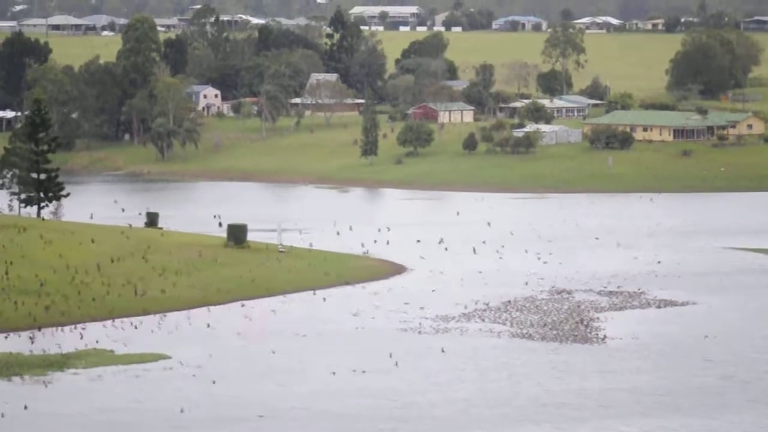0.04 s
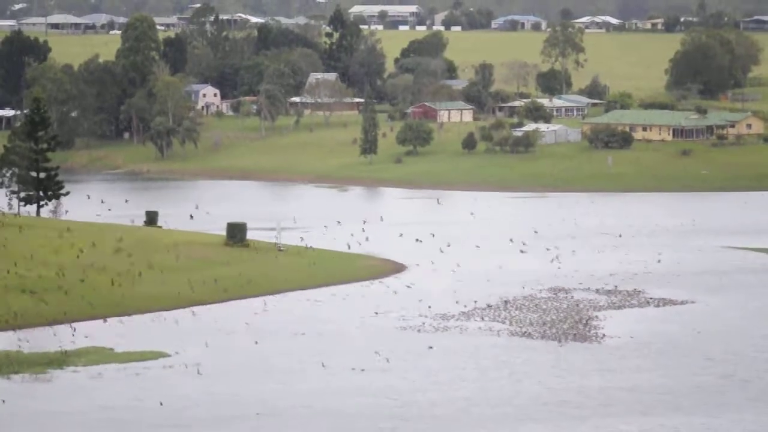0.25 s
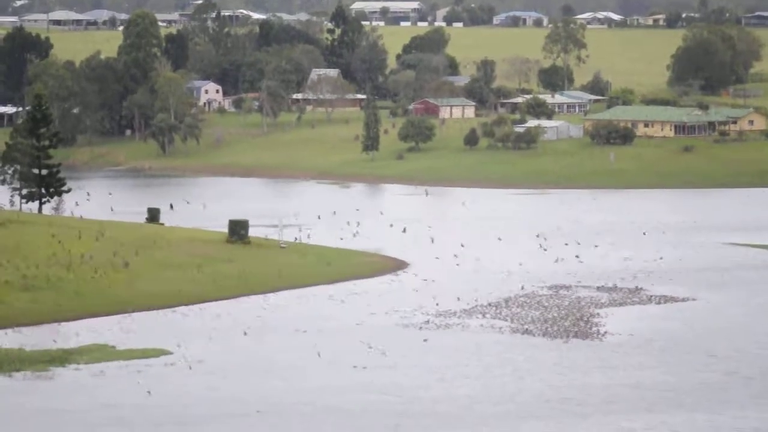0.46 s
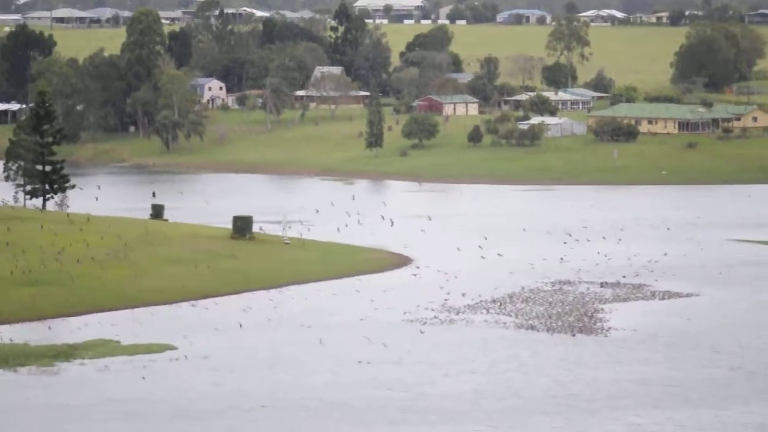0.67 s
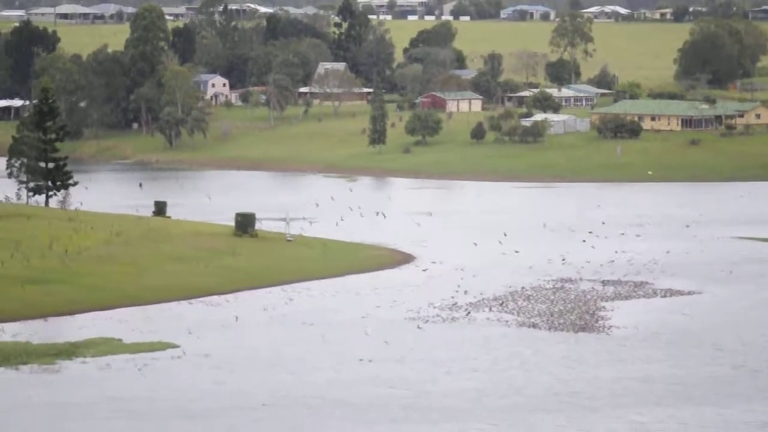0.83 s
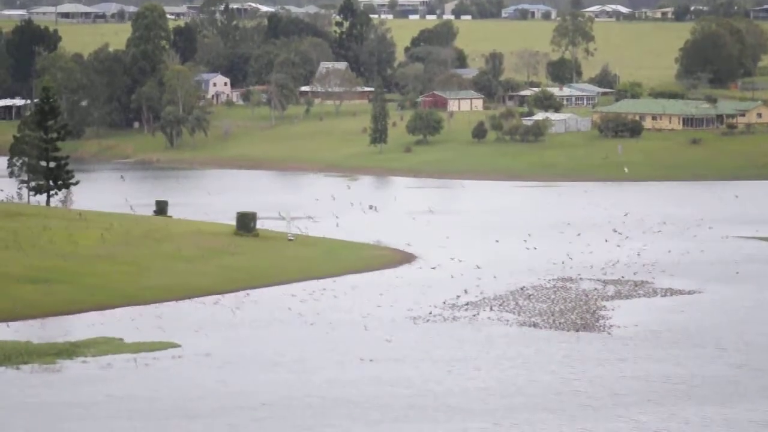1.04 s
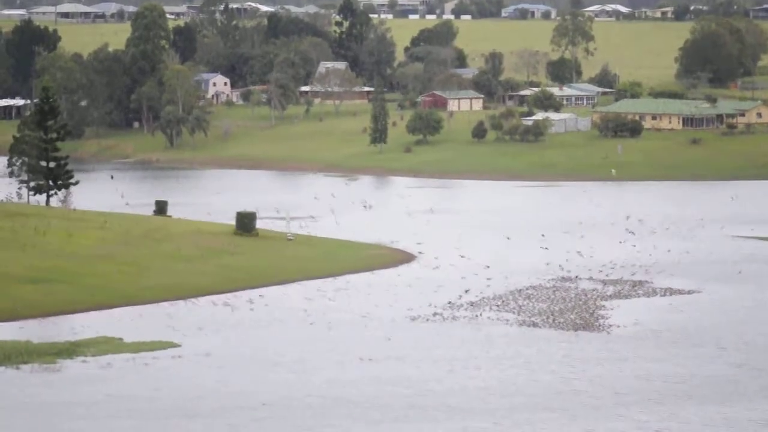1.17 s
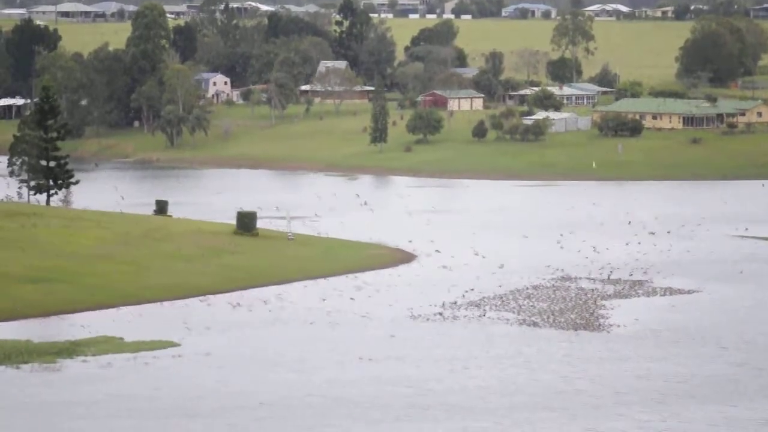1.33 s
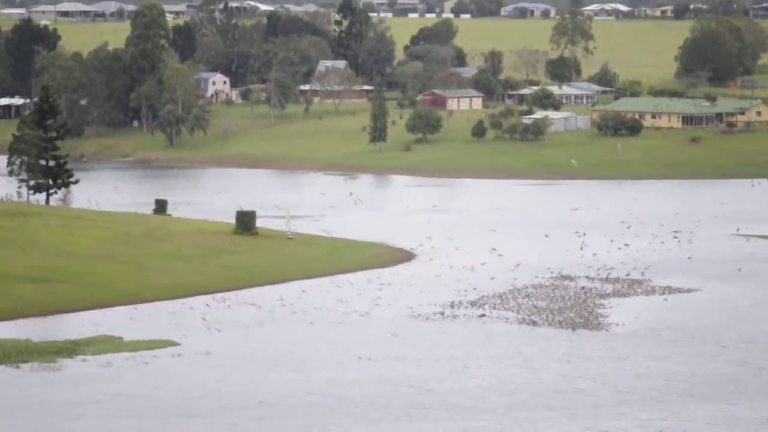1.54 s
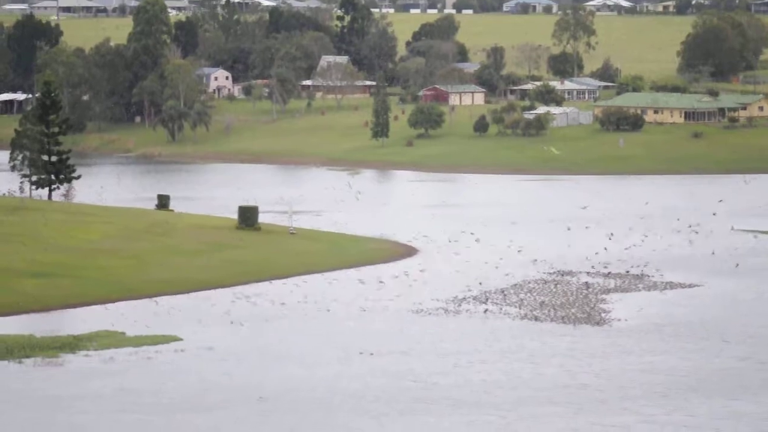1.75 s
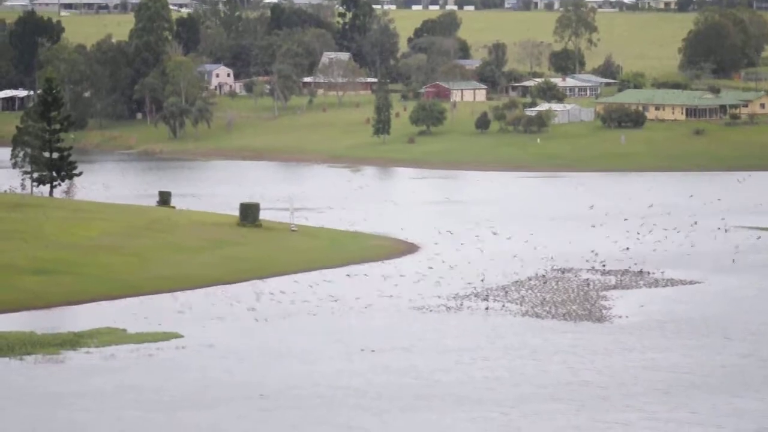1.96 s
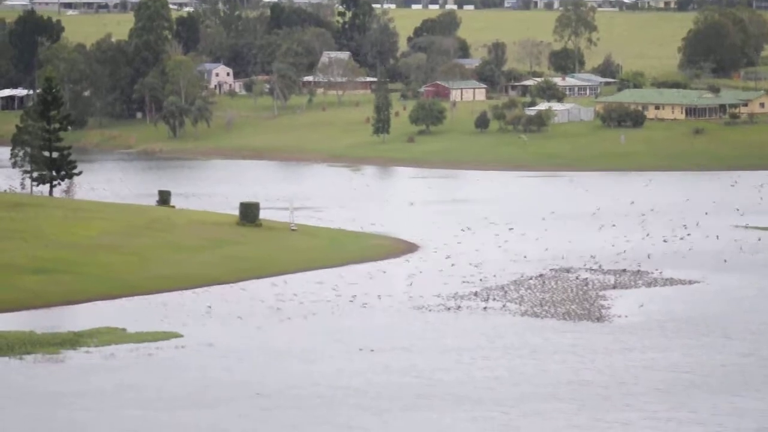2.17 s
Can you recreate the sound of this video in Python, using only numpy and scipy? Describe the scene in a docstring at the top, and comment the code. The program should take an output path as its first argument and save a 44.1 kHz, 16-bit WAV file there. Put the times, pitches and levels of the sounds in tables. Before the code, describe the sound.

Distant ducks keep up a dense, high whistling chatter across open water in a faint breeze. Close to the microphone, handling makes two quick, loud knocks near the start and a few light ticks about halfway through.

```python
"""Whistling ducks on a lake

A big flock calls far out on the water: nearer whistles, each a tone gliding along an arch of pitch,
stand out of a dense chorus, over faint wind and hum. Close by, a hand-held camera is knocked twice
and later ticks lightly; each contact rings its damped modes. The sound is mono and sampled slowly,
so the top of the whistles folds back in frequency (aliasing)."""
import sys
import numpy as np
from scipy import signal
from scipy.io import wavfile

SR = 44100
rng = np.random.default_rng(int(sys.argv[2]) if len(sys.argv) > 2 else 0)


def transcribe(signal):
    """Save signal, clipped to [-1, 1], as a 16-bit WAV file at the path in sys.argv[1]."""
    frames = np.atleast_2d(signal).T
    limited = np.clip(frames, -1, 1)
    pcm = np.round(limited * 32767).astype(np.int16)
    wavfile.write(sys.argv[1], SR, pcm)


N = 97020
TIME = np.arange(N) / SR


def flock():
    """Superposition: near whistles add to a chorus, lower chatter and a wash of the farthest birds."""
    # nearer calls: t/s, duration/s, first f/Hz, middle f/Hz, last f/Hz, level/dB
    near_calls = [(-.02, .09, 4850, 5090, 4750, -41), (.06, 0.058, 4500, 4220, 3540, -46),
                  (.08, 0.042, 3160, 3020, 2800, -50), (.13, 0.11, 4050, 4570, 5040, -52.5),
                  (.215, 0.031, 5400, 5200, 5100, -50), (.24, 0.053, 4500, 4020, 3560, -46.5),
                  (.35, .052, 4650, 4950, 5400, -41), (.412, .065, 4980, 4850, 4520, -41),
                  (.44, .075, 4550, 4220, 4100, -46), (.465, 0.046, 4550, 5260, 5680, -44.5),
                  (.515, 0.073, 5100, 5520, 4850, -43.5), (.595, 0.054, 4800, 5190, 5620, -44),
                  (.665, 0.094, 4700, 4680, 4320, -46), (.77, 0.057, 3950, 4280, 4750, -51),
                  (.83, 0.11, 5100, 5310, 5140, -52), (.925, 0.056, 4900, 4780, 4400, -46),
                  (.98, 0.052, 3390, 3670, 3600, -48), (1.02, 0.042, 3720, 3350, 2900, -45),
                  (1.075, 0.089, 3600, 4250, 4400, -46), (1.16, .06, 4450, 4750, 4850, -47),
                  (1.215, 0.035, 4800, 5100, 5440, -45.5), (1.275, 0.065, 4950, 4670, 4620, -47),
                  (1.365, 0.033, 4300, 4710, 5200, -45.5), (1.43, 0.087, 4850, 4400, 3730, -48.5),
                  (1.525, 0.037, 3450, 3990, 4180, -46.5), (1.555, .07, 3100, 3150, 3360, -47.5),
                  (1.60, 0.063, 4200, 5200, 5820, -46), (1.612, .075, 4800, 4400, 3950, -49.5),
                  (1.69, 0.094, 4550, 3830, 3570, -62), (1.865, 0.039, 4800, 4600, 4030, -49.5),
                  (1.952, .075, 3950, 4660, 5170, -42.5), (2.035, .06, 4280, 4190, 3850, -47),
                  (2.16, .05, 3750, 3670, 3650, -46), (2.155, 0.098, 2400, 2500, 2540, -47)]
    # spectrum of the wash: f/Hz, relative density level/dB
    wash_spectrum = [(900, -30), (1600, 1), (2400, 1.5), (3100, 2.5), (4000, 3.5), (4700, -4), (5200, -2),
                     (5600, 1)]
    # swell of the chorus and the wash: t/s, level/dB
    excitement = [(0, 1), (.3, 0), (.42, 0), (.7, .5), (.87, -5), (1.02, -3), (1.2, 2.5), (1.5, -0.5),
                  (1.65, -0.5), (1.8, -1), (1.98, 0), (2.2, -3)]
    wash = from_db(-46) * banded_noise(wash_spectrum, patchy_db=2.75)
    near = shore_echoes(whistles(near_calls))
    chorus = from_db(-52.5) * crowd(per_s=220, low_hz=3100, high_hz=5200)
    chatter = from_db(-55) * crowd(per_s=160, low_hz=1736, high_hz=3100)
    return near + level_curve(excitement) * (wash + chorus) + chatter


def whistles(calls, edge_share=0.14, flutter_db=2.0, waver_share=0.01):
    """Frequency modulation: each call is a sine on a parabola of pitch, unsteady in pitch and level."""
    out, waver, flutter = np.zeros(N), drift(120), drift(100)
    for start, length, first, middle, last, db in calls:
        span = np.arange(max(int(start * SR), 0), min(int((start + length) * SR), N))
        progress = np.clip((span / SR - start) / length, 0, 1)
        own = (span + rng.integers(N)) % N  # each call wavers in its own way
        arch = (middle - (first + last) / 2) * (1 - (2 * progress - 1) ** 2)
        hz = (first + (last - first) * progress + arch) * (1 + waver_share * waver[own])
        edge = np.minimum(np.minimum(progress, 1 - progress) / edge_share, 1)
        envelope = np.sin(np.pi / 2 * edge) * from_db(db + flutter_db * flutter[own])
        out[span] += envelope * np.sin(2 * np.pi * np.cumsum(hz) / SR)
    return out


def crowd(per_s, low_hz, high_hz, call_s=0.083, arch_share=0.17, spread_db=6.5):
    """Poisson process: birds call independently, on a rising, level or falling part of an arch; rms 1."""
    draws = rng.random((800, 5))
    starts = np.cumsum(-np.log(draws[:, 0])) / per_s - call_s
    calls = []
    for start, (_, size, pitch, lean, distance) in zip(starts, draws):
        if start < N / SR:
            peak_hz = low_hz + (high_hz - low_hz) * pitch
            from_peak = 2 * lean - 1 + np.array([-.5, 0, .5])
            arch_hz = peak_hz * (1 - arch_share * from_peak ** 2)
            db = spread_db * min(-np.log(distance), 3)
            calls.append((start, call_s * (.5 + size), *arch_hz, db))
    return rms_one(whistles(calls))


def shore_echoes(direct, count=24, echo_db=-4.5, t60_s=0.35):
    """Reflection: banks and trees add scattered echoes, weaker the later they arrive."""
    delays = rng.uniform(0.0091, 0.16, count)
    gains = from_db(-60 * delays / t60_s)
    echoes = sum(gain * np.pad(direct, (int(s * SR), 0))[:N] for s, gain in zip(delays, gains))
    return direct + from_db(echo_db) * echoes / np.linalg.norm(gains)


def camera_knocks():
    """Impact excitation: two knocks, each with its bounces, ring the camera's case."""
    # contacts: t/s, level/dB, brightness f/Hz
    knocks = [(.2108, -4, 4300), (.2127, -10, 2380), (.2152, -17, 3170), (.2192, -27, 2290),
              (.2704, -7.5, 940), (.2721, -12.5, 2300)]
    # modes of the case: f/Hz, level/dB, T60/s
    case_modes = [(322, -10, 0.048), (484, -20, 0.025), (710, -8.5, 0.01), (1044, -11.5, 0.012),
                  (1360, -7, 0.015), (1710, -12, .012), (1730, -12.5, 0.026), (1944, -8.5, 0.011),
                  (2216, -29.5, 0.084), (2290, -40.5, 0.01), (3100, -20.5, 0.02), (3760, -15, 0.012),
                  (4300, -21, 0.011), (4950, -13, 0.0076)]
    return struck_body(knocks, case_modes, low_cut_hz=250.5, rub_db=-15.5)


def camera_ticks():
    """Free vibration: a small, lightly struck part rings at higher frequencies than the case."""
    # contacts: t/s, level/dB, brightness f/Hz
    ticks = [(1.1219, -23, 6500), (1.1236, -23, 3570), (1.1325, -48, 4540), (1.1425, -30, 5900),
             (1.1705, -19.5, 1500)]
    # modes of the part: f/Hz, level/dB, T60/s
    part_modes = [(1540, -19, 0.024), (2000, -16.5, .01), (2200, 0, 0.013), (2300, -27.5, .1),
                  (3180, -15, .05), (3300, -4, 0.012), (4400, -7, .009), (4750, 1, 0.0085)]
    return struck_body(ticks, part_modes, low_cut_hz=1200, rub_db=-3.5)


def struck_body(contacts, modes, low_cut_hz, rub_db, rub_t60_s=0.074):
    """Modal response: impulses, softened by the finger and trailed by rubbing, drive every mode."""
    force, impulse = np.zeros(N), TIME == 0
    for s, db, bright_hz in contacts:
        start = int(s * SR)
        rub = rng.standard_normal(N) * from_db(-60 * np.minimum(TIME / rub_t60_s, 3))
        push = impulse + from_db(rub_db) * rub / np.linalg.norm(rub)
        softening = signal.butter(4, bright_hz, fs=SR, output="sos")
        force[start:] += from_db(db) * signal.sosfilt(softening, push)[:N - start]
    body = sum(from_db(db) * ring(force, hz, t60) for hz, db, t60 in modes)
    return signal.sosfilt(signal.butter(4, low_cut_hz, "high", fs=SR, output="sos"), body)


def ring(force, hz, t60):
    """Damped oscillator: a unit impulse rings at amplitude 1 and decays exponentially."""
    radius, angle = from_db(-60 / (t60 * SR)), 2 * np.pi * hz / SR
    return signal.lfilter([.5, 0, -.5], [1, -2 * radius * np.cos(angle), radius ** 2], force + 1e-18)


def wind():
    """Turbulence: air moving over water and trees gives a soft broadband noise."""
    # spectrum of the wind: f/Hz, relative density level/dB
    spectrum = [(20, -33), (35, -21), (60, -12.5), (110, -6), (140, -13.5), (200, -6.5), (320, -4.5),
                (480, -5), (640, -4.5), (800, -5.5), (1080, -4), (1600, -10.5), (2500, -8.5), (5000, -29)]
    # strength of the wind: t/s, rms level/dB
    strength = [(0, -46), (.4, -46), (.95, -45.5), (1.35, -44.5), (1.7, -45), (2.2, -46)]
    return level_curve(strength) * banded_noise(spectrum, patchy_db=0.53)


def hum(hz=173.7, rms_db=-63, waver_db=1.5):
    """Amplitude and phase modulation: a faint low tone wavers slowly at random."""
    amplitude = np.sqrt(2) * from_db(rms_db + waver_db * drift(5))
    return amplitude * np.sin(2 * np.pi * hz * TIME + .6 * drift(2))


def banded_noise(spectrum, patchy_db):
    """Spectral shaping: third-octave bands of noise, each flickering on its own; rms 1."""
    edges = 18 * 2 ** (np.arange(27) / 3)
    hz, db = np.transpose(spectrum)
    out, white = 0, rng.standard_normal((2, N + SR // 2))
    for k, (low, high) in enumerate(zip(edges, edges[1:])):
        bandpass = signal.butter(2, [low, high], "band", fs=SR, output="sos")
        band = signal.sosfilt(bandpass, white[k % 2])[-N:]
        centre_db = np.interp(np.log(low * high) / 2, np.log(hz), db)
        out = out + band * from_db(centre_db + patchy_db * drift(18))
    return rms_one(out)


def drift(corner_hz):
    """Low-pass filtered noise: a slow random wander of rms 1."""
    step, settle = 40, 2000
    pole = np.exp(-2 * np.pi * corner_hz * step / SR)
    white = rng.standard_normal(N // step + settle + 2)
    slow = signal.lfilter([1], [1, -2 * pole, pole ** 2], white)[settle:]
    return np.interp(np.arange(N) / step, np.arange(len(slow)), rms_one(slow))


def level_curve(rows):
    """Gain over time, interpolated between rows of t/s, level/dB."""
    return from_db(np.interp(TIME, *np.transpose(rows)))


def from_db(db):
    """Level to amplitude ratio."""
    return 10 ** (np.asarray(db) / 20)


def rms_one(x):
    """Normalisation to rms 1."""
    return x / np.sqrt(np.mean(x ** 2) + 1e-20)


def scene():
    """Superposition: lake and camera sounds add, the same in both channels."""
    return np.tile(hum() + wind() + flock() + camera_knocks() + camera_ticks(), (2, 1))


def record(dry, step=4, overload=0.75):
    """Aliasing: sampling at 11025 Hz mirrors the treble about 5.5 kHz. The hardest knock overloads."""
    sampled = dry * step * (np.arange(N) % step == 0)
    smoothing = signal.firwin(71, cutoff=5290, fs=SR)  # leaves a weak image just above 5.5 kHz
    image_cut = signal.firwin(301, cutoff=6300, window=("kaiser", 9), fs=SR)
    smooth = signal.fftconvolve(sampled, np.convolve(smoothing, image_cut)[None], "same", axes=1)
    treble_cut = signal.cheby2(12, 70, 16000, fs=SR, output="sos")
    return signal.sosfilt(treble_cut, np.clip(smooth, -overload, overload))


dry = scene()
out = record(dry)
transcribe(out)
```